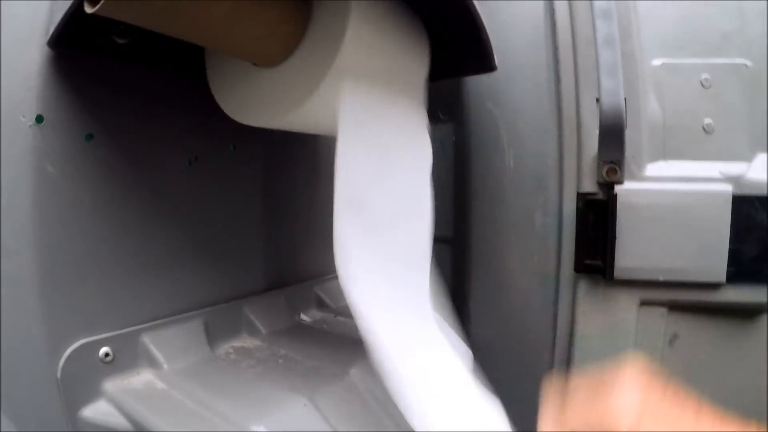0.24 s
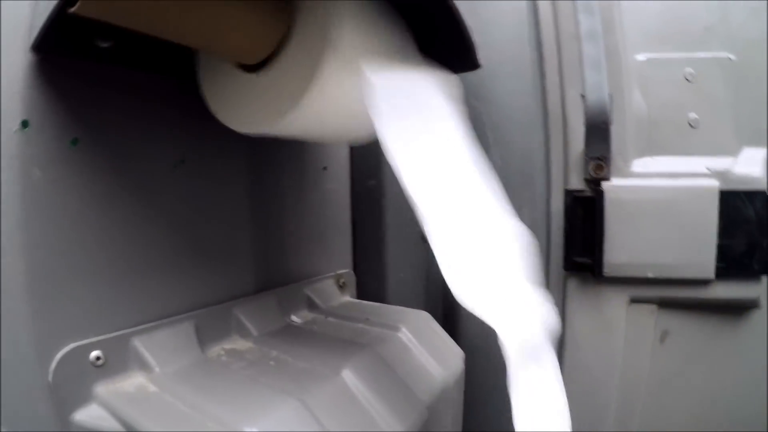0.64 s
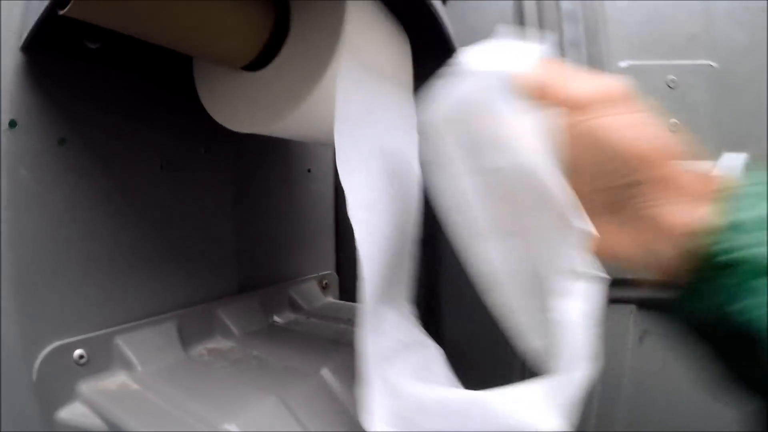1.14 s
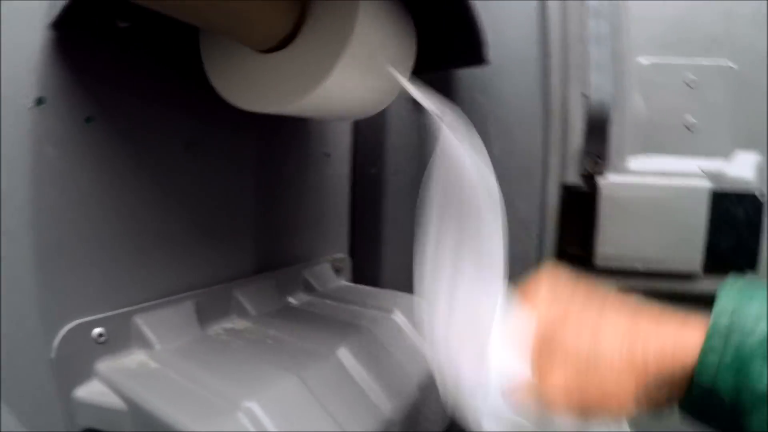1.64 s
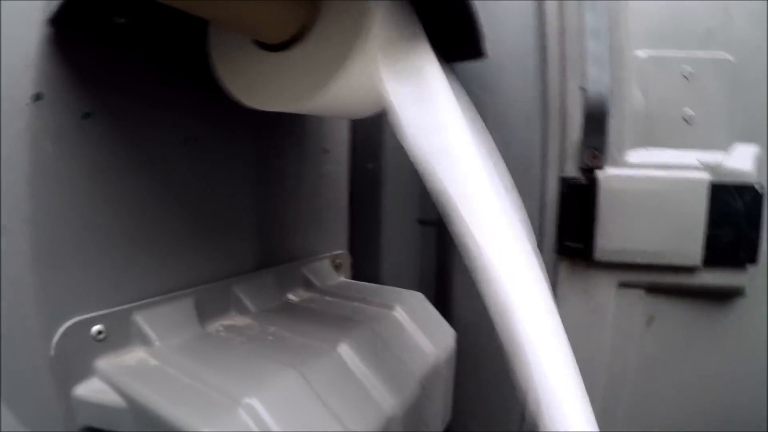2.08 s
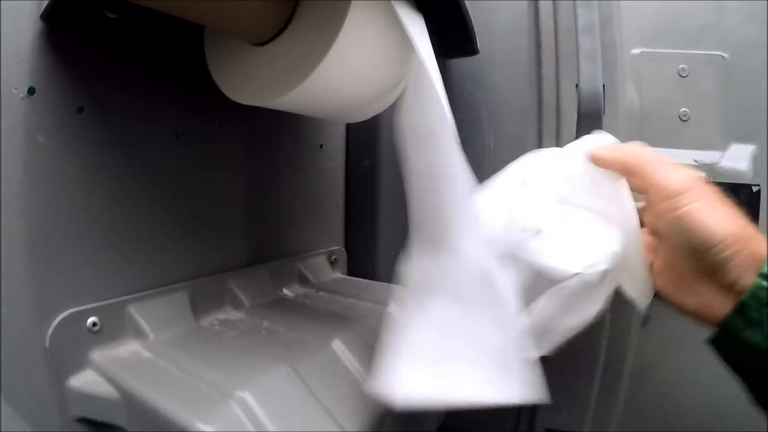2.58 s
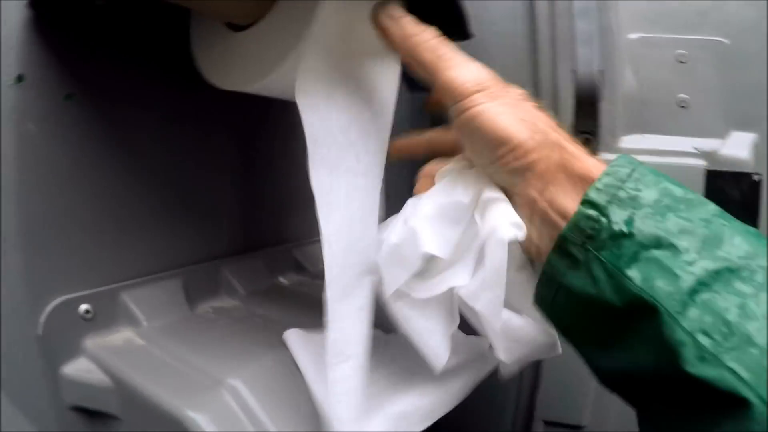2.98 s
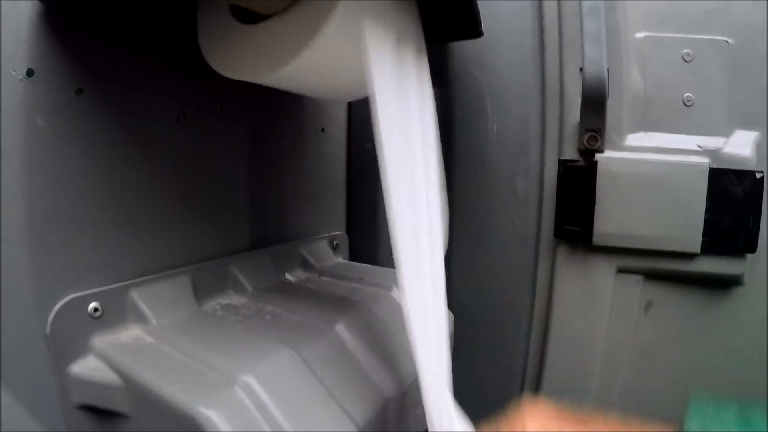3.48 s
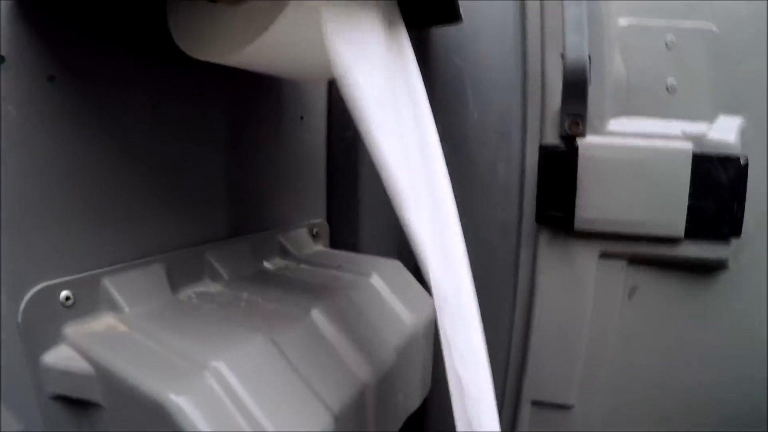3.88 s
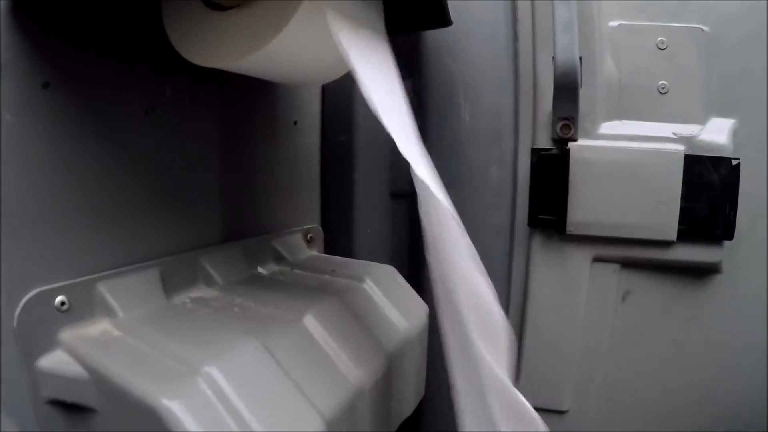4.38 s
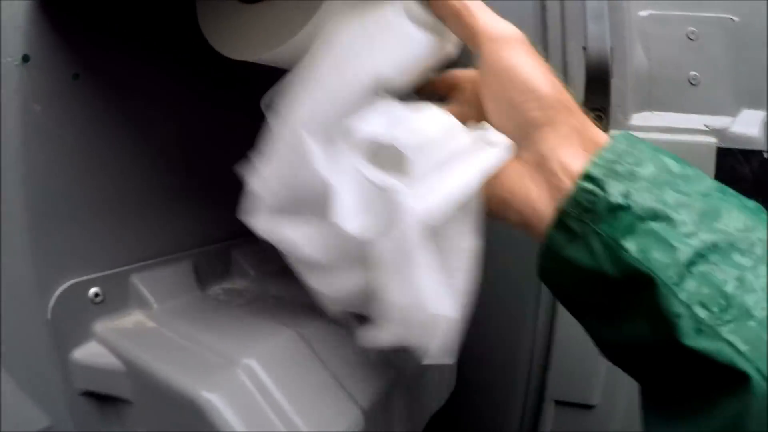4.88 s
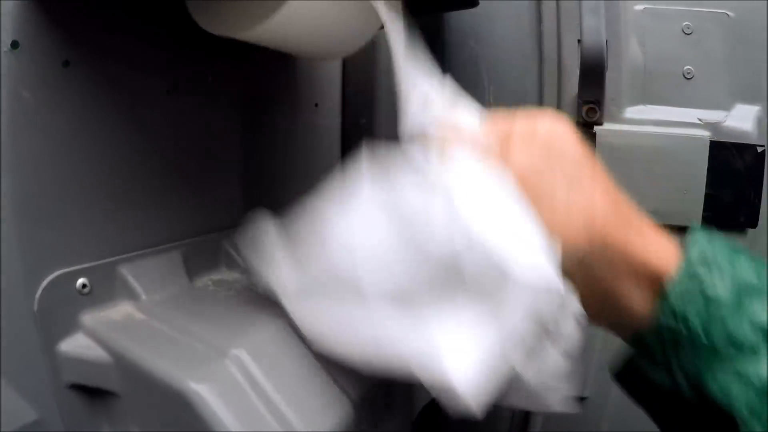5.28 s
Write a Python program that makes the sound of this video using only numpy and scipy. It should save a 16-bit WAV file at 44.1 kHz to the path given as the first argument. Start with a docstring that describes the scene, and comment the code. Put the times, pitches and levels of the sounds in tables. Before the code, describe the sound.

Quick pulls of thin paper hiss and crackle while the roll bumps and drums its plastic housing over a heavy low rumble in a small cabin.

```python
"""Paper roll in a small plastic cabin

Inside a small plastic cabin, paper is pulled off a roll in a plastic wall dispenser. The roll drums the
housing as filtered noise, hums in its tube, and jumps and knocks as damped resonances. The sheet rustles,
hisses and snaps in grainy noise; the lid claps and clatters. The thin walls boom with every move.
Two unequal microphone ports take it in, opening from mono to stereo soon after one second.
"""
import sys
import numpy as np
from scipy import signal
from scipy.fft import rfft, irfft, next_fast_len
from scipy.io import wavfile
from scipy.ndimage import uniform_filter1d, map_coordinates

SR = 44100
rng = np.random.default_rng(int(sys.argv[2]) if len(sys.argv) > 2 else 0)


def unload_audio(sound):
    """Save the sound as a 16-bit wav file, at the path given as the first command line argument."""
    columns = np.transpose(np.atleast_2d(sound))
    # keep every value between -1 and 1, then stretch to whole-number steps
    steps = np.round(np.clip(columns, -1, 1) * 32767)
    wavfile.write(sys.argv[1], SR, steps.astype(np.int16))


N = 243843

# In every table, left-right is the left port's level over the right port's.
# Answer of the cabin: f/Hz, t60/s
CABIN_DECAY = [(200, 0.06), (1000, 0.18), (3000, 0.19), (10000, 0.32)]
# Boom of the cabin walls: t/s, deep level/dB, upper level/dB, left-right/dB
WALL_BOOM = [(0.0, -48, -41, 0), (0.06, -32.5, -36.5, -7), (0.34, -42, -52, -6), (0.66, -28, -26, -11),
             (0.88, -36.5, -37, -4), (1.77, -17.5, -25.5, 0.5), (1.8, -28, -35, -3), (1.88, -28, -13, -2),
             (2.08, -16, -26, 1), (2.39, -20.5, -23.5, -6), (2.43, -13.5, -24.5, -2),
             (2.54, -24, -24, -4.5), (2.59, -19, -14, -1.5), (2.68, -20.5, -20, -5), (3.28, -26, -31.5, -6),
             (3.33, -19.5, -29.5, -0.5), (3.49, -13, -17.5, -2), (3.54, -23, -26.5, -2),
             (3.68, -19.5, -13.5, 0), (3.91, -21, -26.5, -5), (4.3, -26.5, -28, -1),
             (4.34, -24, -33.5, -8.5), (5.05, -25, -31, -3), (5.08, -16, -25, -2.5), (5.22, -24, -32, -3),
             (5.36, -20, -30, 1), (5.41, -20, -18.5, 1), (5.53, -34, -30, -7)]
# Spectra of the deep and upper boom: f/Hz, relative level/dB per Hz
DEEP_SPECTRUM = [(8.8, -60), (15, -6), (52, 1.5), (68, -12), (110, -120)]
UPPER_SPECTRUM = [(31, -13), (52, 0), (75, 4.5), (113, -15), (150, -12), (200, -29.5), (330, -120)]
# Low flutter over the boom: t/s, level/dB, left-right/dB
WALL_FLUTTER = [(0.0, -44, 4), (0.21, -50, -3), (0.46, -50, 0.0), (0.6, -42, 4), (1.0, -52, 8),
                (1.68, -43, -1), (2.19, -49, -4), (2.32, -35, -22), (2.37, -43, -0.5), (2.69, -28, -17),
                (2.72, -41, 3), (2.8, -39, -11.0), (2.86, -28, 4), (2.99, -48, -21), (3.02, -51, 6),
                (3.17, -26.5, -22.5), (3.22, -36, 6), (3.34, -30.5, 0), (3.7, -38, 0), (3.77, -27.5, -18),
                (4.34, -36, 11), (4.56, -34, -28), (4.76, -50, -17), (5.53, -27, -5)]
GUST_DB, GUSTS_PER_S = 1, 12  # random swells of the boom
# A knock shoves the wall: hold, fall, then levels re the knock in the wall
SHOVE_S, SHOVE_FALL_DB_PER_S, SHOVE_BOOM_DB, SHOVE_FLUTTER_DB = 0.024, 201, -2, -8

# Dead bumps that do not ring: t/s, pulse height/dB, half width at 1/e/s
PUSH_EVENTS = [(1.2494, -18, 0.00065), (1.252, -13, .0011)]
# Lid claps and clatters on: t/s, clap level/dB before the modes, ring time/s, clatter level/dB, clatter t60/s
CLAP_EVENTS = [(.002, -50, .002, -48, 0.13), (0.061, -43, 0.0022, -47, 0.14),
               (0.614, -37, 0.0024, -35.5, 0.14), (1.25, -51, .0015, -47, 0.16),
               (2.097, -20.5, 0.0022, -31, .16), (2.118, -36, .002, -37, 0.19),
               (3.602, -20.5, 0.0026, -36, .12), (3.6729, -9, 0.0014, -27.5, 0.19),
               (5.017, -45, .002, -46.5, 0.13), (5.296, -48, .002, -46, .1), (5.3073, -27, 0.0018, -39, .1),
               (5.319, -28, .002, -37, 0.22), (5.3846, -9, 0.001, -29, 0.15), (5.418, -36, .002, -40, 0.19)]
# Modes of the lid: f/Hz, width/Hz, level/dB, left-right/dB
LID_MODES = [(2040, 810, -8, -5), (2595, 730, 1.5, -1), (3650, 860, -7, 0), (4680, 920, -15.5, 3),
             (6400, 1200, -27, -2)]
# Ticks and snaps: t/s, level/dB before a common trim, f/Hz, t60/s, share of ring (0-1)
TICK_EVENTS = [(0.17, -53, 3940, 0.07, 0.5), (0.3711, -47, 4050, 0.019, 0.6), (0.393, -45, 3680, 0.04, 0.4),
               (0.4299, -45, 6200, 0.02, 0.5), (0.4644, -46, 6200, 0.01, 0.8),
               (0.4903, -43, 3840, 0.04, 0.4), (0.5457, -45, 3520, 0.02, 0.3),
               (0.5796, -46, 6000, 0.02, 0.2), (.595, -50, 3500, .015, .2),
               (1.2495, -38, 1500, 0.0066, 0.4), (1.5609, -33, 3900, 0.042, 0.5),
               (1.7285, -39, 3800, .02, .6), (1.7534, -24, 2260, 0.015, 0.5), (1.7538, -33, 6500, .025, .6),
               (1.821, -44, 3900, .03, .9), (1.836, -39, 3900, .03, .9), (1.8678, -30, 3770, 0.026, 0.7),
               (1.938, -27, 3800, 0.012, 0.9), (3.008, -28.5, 3100, 0.017, 1),
               (3.21, -21.5, 5840, 0.0092, 0.44), (3.395, -31, 5600, .02, .7),
               (3.497, -24.5, 3880, 0.03, 1), (3.499, -29, 5540, .03, .8), (3.516, -28, 3830, .012, 1),
               (3.5674, -27, 3720, 0.024, 0.8), (3.573, -25, 3200, .02, .8), (3.575, -23, 7500, .02, .6),
               (4.1704, -40, 6260, 0.012, 0.5), (4.388, -28, 4500, 0.012, 0.3),
               (4.787, -32, 3080, 0.025, 1), (5.22, -36, 6940, 0.0097, 0.7)]
# Short grainy noise bands, low thumps and knock tones with higher rubs and scuffs:
# t/s, length/s, level/dB, centre f/Hz, width/Hz of one filter pass
BAND_EVENTS = [(.39, .04, -44, 165, 50), (.497, .03, -42, 490, 100), (.497, .015, -52, 1100, 500),
               (.55, .03, -42, 165, 50), (0.616, .03, -28, 309, 50), (1.418, 0.021, -41.5, 724, 160),
               (1.51, .03, -33.5, 165, 40), (1.56, 0.022, -46, 800, 200), (1.609, 0.017, -46, 830, 170),
               (1.654, 0.023, -43.5, 1010, 200), (1.68, 0.039, -34.5, 166, 40.4),
               (1.886, .03, -41, 520, 200), (1.935, 0.047, -47, 875, 250), (2.095, .025, -25, 300, 50),
               (2.1, .09, -28.5, 510, 150), (2.428, .035, -21, 188.5, 40), (2.425, .015, -47, 2480, 250),
               (2.435, 0.036, -29, 358, 50), (2.439, 0.02, -35, 613, 120), (2.57, .015, -38, 1400, 500),
               (2.59, .03, -22, 100, 30), (2.72, .03, -22, 100, 30), (3.002, 0.094, -52, 1510, 350),
               (3.24, .06, -40, 500, 150), (3.336, 0.017, -40, 1430, 300), (3.607, .007, -28, 1540, 300),
               (3.615, .02, -26, 326, 120), (3.644, 0.023, -30, 242, 50), (3.858, 0.011, -45.5, 1120, 250),
               (3.858, .015, -54, 3700, 500), (3.9, .2, -48, 750, 500), (3.933, .012, -52, 3800, 500),
               (4.0, .09, -57, 3850, 400), (4.063, 0.049, -48, 1140, 250), (4.075, 0.075, -37.5, 200, 60),
               (4.17, .06, -57, 3850, 500), (4.225, .1, -39, 200, 60), (4.201, 0.041, -43.5, 1060, 230),
               (4.461, 0.027, -47, 856, 200), (4.49, 0.04, -44.5, 1370, 300), (4.54, .1, -42.5, 200, 60),
               (4.55, .02, -45, 495, 150), (4.61, .02, -57, 1090, 250), (5.225, 0.045, -41.5, 465, 100),
               (5.303, .022, -26, 255, 40), (5.312, 0.083, -33, 540, 200)]
BAND_RISE_DB_PER_S, BAND_FALL_DB_PER_S = 1400, 500

# Steady slide of the sheet: t/s, rustle level/dB, fine hiss level/dB
SHEET_SLIDE = [(0.0, -84, -85), (0.38, -65, -74), (0.54, -89, -75), (0.85, -70, -67), (1.02, -63, -63.5),
               (1.13, -66, -65), (1.26, -52, -62), (1.35, -53, -60.5), (2.06, -48, -61), (2.88, -47.5, -59),
               (3.06, -43.5, -57.5), (3.4, -52, -61), (3.53, -58, -54), (3.63, -54, -70),
               (3.89, -44.5, -56), (4.02, -49.5, -61), (4.47, -45, -56), (4.59, -45, -58.5),
               (5.25, -50, -64), (5.53, -46.5, -59)]
# Grabs and tugs at it: t/s, length/s, rustle level/dB, fine hiss level/dB, scuffing level/dB, rise/dB per s
GRAB_EVENTS = [(0.0, 0.011, -65, -85, -77, 1200), (0.606, 0.0085, -50, -85, -62, 2000),
               (1.16, .04, -56, -66, -65, 600), (1.224, 0.08, -54, -65, -58, 300),
               (1.41, 0.013, -40.5, -57, -45, 2500), (1.558, 0.07, -49, -65, -66, 2500),
               (1.732, .012, -46, -62, -51, 3000), (1.7535, 0.027, -35, -49, -44, 6000),
               (1.87, 0.008, -43, -58, -48, 4000), (1.936, 0.0054, -42, -64, -58, 2498),
               (2.046, 0.075, -39, -55.5, -51, 500), (2.427, 0.023, -37, -53, -46, 1500),
               (2.477, 0.027, -41.5, -55, -51, 300), (2.547, .015, -49, -62, -60, 300),
               (2.982, 0.066, -53, -70, -46, 800), (3.208, 0.0089, -36.5, -52, -54, 6000),
               (3.317, 0.02, -41, -59, -66, 2000), (3.38, 0.021, -40, -55, -64, 250),
               (3.494, 0.01, -34, -50, -46, 1500), (3.51, 0.012, -42, -52, -43, 800),
               (3.565, 0.0084, -33, -48, -32.5, 1000), (3.6, 0.009, -36.5, -63, -50, 1000),
               (3.662, 0.026, -41, -75, -50, 1200), (3.847, 0.019, -39.5, -57, -56, 600),
               (3.928, 0.026, -41.5, -60, -46, 1200), (4.008, 0.069, -41, -56, -55, 1200),
               (4.17, 0.065, -40.5, -57, -46, 2000), (4.392, 0.021, -46.5, -67, -60, 3000),
               (4.488, 0.12, -40.5, -58, -50, 1200), (4.782, 0.021, -38.5, -55, -50, 1201.5),
               (4.933, 0.14, -43.5, -57, -48.5, 600), (5.219, 0.011, -47, -54, -50, 2500),
               (5.306, 0.022, -43, -74, -53, 1200), (5.384, 0.012, -32.5, -62, -36, 6000),
               (5.517, .03, -38, -56, -47, 800)]
GRAB_FALL_DB_PER_S = 290
SLIDE_PAN_DB, GRAB_PAN_DB = -0.5, 0.3  # left-right
# Dull brushing of the slack sheet: t/s, level/dB
SLACK_BRUSH = [(0.0, -75), (0.3, -82), (0.4, -66), (0.6, -67), (0.8, -70), (1.03, -56), (1.13, -61),
               (1.2, -51), (1.3, -54), (1.4, -59), (2, -63), (5.53, -62)]
# Spectra of rustle, fine hiss and brushing: f/Hz, relative level/dB per Hz
RUSTLE_SPECTRUM = [(1760, -2.5), (3000, -5.5), (3890, -5), (4240, -9), (4940, -7.5), (6270, 0.5),
                   (7650, -3), (8300, -13), (10800, -32), (18300, -120)]
HISS_SPECTRUM = [(4880, -47), (8300, -3), (9830, -4.5), (11300, -12), (12400, -11.5), (14800, -15.5)]
BRUSH_SPECTRUM = [(900, -30), (1600, -2), (4000, -3), (6600, -4), (7400, -22), (10000, -120)]

# Stretches in which the roll spins freely: t/s, length/s, drumming level/dB, tube hum level/dB
SPIN_EVENTS = [(0.0, 0.024, -53, -63), (0.162, 0.024, -53.5, -61), (0.396, 0.051, -61, -67),
               (0.53, 0.015, -58, -46), (0.564, 0.034, -42, -40), (1.277, .15, -49.5, -69),
               (1.497, 0.07, -44.5, -39), (1.559, 0.062, -40.5, -34), (1.645, 0.025, -36.5, -31.5),
               (1.708, 0.063, -37.5, -39), (1.905, .02, -33.5, -40), (1.945, 0.057, -33, -33.5),
               (2.271, 0.16, -42.5, -54), (2.644, 0.28, -41, -58), (2.997, 0.093, -41, -53),
               (3.246, 0.041, -45, -33.5), (3.357, 0.029, -26.5, -22), (3.532, 0.15, -27.5, -29.5),
               (3.795, 0.059, -37, -44.5), (3.953, 0.034, -40, -39), (4, 0.039, -36.5, -35),
               (4.07, 0.027, -38, -40), (4.207, 0.045, -38.5, -44), (4.526, 0.069, -35, -41),
               (4.928, 0.017, -41, -54), (5.261, 0.17, -39.5, -35), (5.396, 0.014, -31, -29)]
SPIN_RISE_DB_PER_S, SPIN_FALL_DB_PER_S = 170, 142
TUBE_RISE_DB_PER_S, TUBE_FALL_DB_PER_S = 319, 312
IDLE_DRUM_DB = -53.5
# After a knock the roll wobbles on: drumming and hum re the knock's body level
WOBBLE_DELAY_S, WOBBLE_S, WOBBLE_DRUM_DB, WOBBLE_HUM_DB = 0.026, 0.0078, -13, -15
# Air in the cardboard tube: f/Hz, width/Hz, level/dB, left-right/dB
TUBE_MODES = [(473.2, 20, 3, 3.5), (613, 40, -11.5, 1)]
HUM_STEADY = 0.48  # amplitude share of the hum that is a held tone
# Paper dragged over the housing: t/s, scuffing level/dB
DRAG = [(0.0, -51), (0.21, -71), (0.42, -60), (0.58, -59), (.8, -57), (1.02, -51), (1.12, -53.5),
        (1.19, -50.5), (1.43, -50), (2.03, -49), (2.22, -53.5), (2.77, -50.5), (3.43, -43), (3.54, -57),
        (3.65, -46), (4.07, -55), (4.24, -62), (4.45, -53.5), (4.65, -43), (5.24, -53), (5.53, -45)]
# Spectrum of the scuffing: f/Hz, relative level/dB per Hz
SCUFF_SPECTRUM = [(290, -8), (500, -6), (567, -7), (1390, -9), (1890, -16), (3120, -21.5), (5000, -23.5),
                  (6500, -41), (11000, -120)]
# Whisper of the spindle: f/Hz, width/Hz, level/dB, left-right/dB
SPINDLE_MODES = [(3880, 190, -8, 4), (5930, 250, 2, 6)]
SPIN_SCUFF_DB, WHISPER_DB = -19.5, -16.5  # scuffing re a spin; the spindle re the scuffing

# Knocks of the roll: t/s, level/dB in wall, body, shell and lid of the housing (before each group's trim),
# base rattle t60/s, share of one hard blow (0-1)
KNOCK_EVENTS = [(.001, -37, -28, -35.5, -40, 0.26, 0.36), (.06, -54, -50, -35, -40.5, 0.21, 0.42),
                (.279, -48, -51, -56, -79, 0.068, 0.81), (0.379, -42, -47, -56, -59, 0.17, 0.34),
                (0.5, -54, -37.5, -41, -63, 0.41, 0.57), (0.602, -47, -40, -27, -40, 0.088, 0.17),
                (.612, -35, -16, -25.5, -25, 0.21, 0.2), (1.2485, -32.5, -31, -30.5, -39, 0.09, 0.68),
                (1.276, -51, -56, -40, -40.5, 0.17, 0.65), (1.406, -40, -39.5, -37.5, -41, 0.31, 0.38),
                (1.556, -38, -49, -43, -70.5, 0.17, 0.68), (1.7531, -25, -26, -29, -44, 0.2, 0.72),
                (1.772, -39, -33.5, -34, -45, .15, .4), (1.968, -29, -23.5, -32, -41.5, 0.27, 0.45),
                (2.092, -29, -8.5, -24, -25, 0.11, 0.24), (2.096, -36, -13.5, -17, -19, 0.22, 0.37),
                (2.424, -17, -24.5, -35, -54, 0.33, 0.6), (2.462, -18, -28, -38, -61, 0.16, .6),
                (2.505, -21, -37, -51, -60, .2, 0.44), (2.566, -18.5, -22.5, -27.5, -52, 0.12, 0.47),
                (2.592, -20.5, -29, -45, -64, 0.22, .5), (2.718, -21.5, -31, -47, -51, 0.16, 0.3),
                (2.741, -27, -32.5, -52, -60, 0.11, 0.48), (2.851, -24, -27.5, -60, -55, 0.21, 0.4),
                (2.875, -27, -35.5, -58, -62, 0.15, .4), (3.21, -33, -31.5, -31, -36, 0.093, 0.73),
                (3.328, -36, -28, -19.5, -59, 0.17, 0.5), (3.492, -28.5, -47, -32.5, -55, 0.29, 0.32),
                (3.603, -27.5, -12.5, -20.5, -19.5, .15, 0.3), (3.623, -25, -20, -28, -31, 0.18, 0.36),
                (3.65, -27, -17.5, -21, -40, 0.18, 0.23), (3.6735, -21.5, -21.5, -21, -20, 0.23, 0.3),
                (4.079, -34.5, -56, -51, -65, 0.44, 0.34), (4.789, -36.5, -37, -35, -42, 0.08, 0.41),
                (5.014, -32.5, -27, -26.5, -35, 0.13, 0.52), (5.026, -27, -28, -32, -35, 0.21, .5),
                (5.057, -29, -30, -45, -36.5, 0.21, 0.39), (5.246, -39, -32.5, -45, -57, 0.12, 0.37),
                (5.303, -64, -17, -28, -27, 0.14, 0.17), (5.308, -50, -30, -28, -23, .08, .4),
                (5.317, -43, -20, -24.5, -24.5, 0.34, 0.45), (5.385, -28.5, -24, -26, -26, 0.19, 0.45)]
# Modes of housing and wall: f/Hz, width/Hz, level/dB, left-right/dB
HOUSING_MODES = [(159.8, 27, 6, -3), (185.3, 22.1, 9.5, -2.5), (251.5, 17.3, -2, 5.5),
                 (309.3, 15.2, 4.5, 4.5), (375, 33, -4, 10), (462, 46, -9.5, 9), (520, 33, -6.5, -3.5),
                 (586, 68, -12.5, 5.5), (719.9, 34, -13.5, 6), (800, 56, 0, 1.5), (933, 418, -3, 0.5),
                 (1090, 51, 1, -6), (1247, 93, 0.5, 1.5), (1609, 108, 2, -3), (1853, 174, 4.5, 10.5),
                 (2260, 700, 4, -0.5), (2260, 210, 7, -8), (2410, 630, 0, 0), (3290, 130, 11, -7),
                 (3520, 470, 6, 7), (4200, 240, -1, 2), (5000, 490, -20.5, -6)]
# Edges of the eight groups of modes: f/Hz
GROUP_EDGES_HZ = [130, 230, 335, 420, 720, 1150, 1700, 2900, 6000]
# The two pieces averaged for each group: indices of wall 0, body 1, shell 2, lid 3
GROUP_PIECES = [(0, 0), (1, 1), (0, 0), (1, 2), (2, 2), (2, 3), (3, 3), (3, 3)]
# Each group re its pieces: level/dB
GROUP_DB = [3.5, 4, 0, 7, 3, 6.5, 4.5, -3]
# Unpitched clatter within each group: level/dB
GROUP_BROAD_DB = [-32, -18, -17, -13, -8, -4.5, -2, -17]
GROUP_APART = [0.024, 0.044, .04, 0.2, 0.81, 0.64, 0.94, 0.19]  # opposed part of the rattle at the ports
GROUP_LIFE = [1.36, 0.34, 0.89, 0.99, 0.87, 0.72, 0.55, 0.5]  # factor on the rattle t60
SOFT_RISE_S = 0.0036  # rise of the rattle at hardness 0, shorter for harder blows
HARD_EDGE_DB = 19  # top group per unit of hardness, counted from 0.5
DETUNE = 0.027  # relative spread of the pitch of each higher mode from blow to blow

# Likeness of the noise at the two ports: f/Hz, correlation (0-1)
PORT_LIKENESS = [(30, 1), (90, 0.86), (135, 1), (190, 0.92), (330, 0.99), (700, 0.56), (1400, 0.051),
                 (2800, 0.44), (4200, 0.87), (6500, 0.03), (10000, 0.051)]
# Unequal microphone ports: f/Hz, left-right/dB before scaling
PORT_LEAN = [(60, 0.5), (150, 3), (380, -12), (950, 3), (2380, -1), (5980, -0.5), (15000, -3)]
# Opening from mono to stereo: t/s, share of left-right difference (0-1)
STEREO_WIDTH = [(0, 0), (1.14, 0), (1.2, .25), (1.32, 1.0), (5.53, 1.0)]
TOP_HZ = 16200


def amp(db):
    """dB to gain."""
    return 10 ** (np.asarray(db) / 20)


def unit(x):
    """Scaled to rms 1."""
    return x / np.sqrt(np.mean(x ** 2) + 1e-20)


def along(points, hz):
    """(Hz, value) points read on a log frequency axis."""
    f, v = np.transpose(points)
    return np.interp(np.log(hz + 1), np.log(f + 1), v)


def curves(rows):
    """One value per sample for each column after the time."""
    s, *cols = np.transpose(rows)
    return [np.interp(np.arange(N) / SR, s, c) for c in cols]


def wobble(rate):
    """A smooth random curve, rate knots a second."""
    knots = rng.standard_normal(int(N * rate / SR) + 4)
    return map_coordinates(knots, [np.arange(N) * rate / SR])


def filtered(x, response):
    """x through a complex response of frequency."""
    m = next_fast_len(N + SR // 2)
    return irfft(rfft(x, m) * response(np.fft.rfftfreq(m, 1 / SR)), m)[..., :N]


def panned(db):
    """Left and right gains for a level difference."""
    return amp(np.array([db, -db]) / 2)


def ringing(modes):
    """Causal left and right response of resonances, alternating in sign."""
    def response(f):
        total = 0
        for k, (centre, width, db, pan) in enumerate(modes):
            resonance = 1j * f * width / (centre * centre - f * f + 1j * f * width)
            total = total + (-1) ** k * amp(db) * panned(pan)[:, None] * resonance
        return total
    return response


def colour(points):
    """Gain of a spectrum table."""
    return lambda hz: amp(along(points, hz))


def noise(response, grain_db):
    """Stereo noise of rms 1, coloured, made lumpy by grains that both ports share."""
    def mix(hz):
        turn = np.arccos(np.clip(along(PORT_LIKENESS, hz), 0, 1)) / 2
        return np.array([np.cos(turn), np.sin(turn)])
    mid, side = filtered(rng.standard_normal((2, N)) * amp(grain_db), mix)
    return unit(filtered(np.array([mid + side, mid - side]), response))


def patchy(x, depth_db):
    """x with random patches of gain over time and frequency, as folds open and close."""
    z = signal.stft(x, nperseg=256)[2]
    field = uniform_filter1d(rng.standard_normal(z.shape[1:]), size=5, axis=0)
    field = uniform_filter1d(field, size=6, axis=1)
    return unit(signal.istft(z * amp(depth_db * unit(field)), nperseg=256)[1][:, :N])


def crackle(rate, top_db, t60):
    """Level in dB of fibres that give way at random: sudden rises that die quickly."""
    snaps = (rng.random(N) < rate / SR) * rng.exponential(size=N)
    dying = signal.lfilter([1], [1, -amp(-60 / (t60 * SR))], snaps)
    return 20 * np.log10(1 + amp(top_db) * dying)


def uneven(count, step, depth_db):
    """Random gain that jumps every step samples, like uneven bounces or grit."""
    return amp(depth_db * np.repeat(rng.standard_normal(count // step + 1), step)[:count])


def bursts(start_s, length_s, db, rise, fall):
    """Power-summed gain of events that rise, hold and fall at set dB per second."""
    t = np.arange(0, N + 32, 32) / SR
    start = start_s[:, None]
    early = np.maximum(start - t, 0)
    late = np.maximum(t - (start_s + length_s)[:, None], 0)
    power = amp(2 * (db[:, None] - rise * early - fall * late)).sum(axis=0)
    return np.interp(np.arange(N) / SR, t, np.sqrt(power))


def add_at(out, s, sound):
    """Lay one event into the stereo track at s seconds."""
    out[:, round(s * SR):][:, :sound.shape[1]] += sound


def cabin(x):
    """A fresh random tail every eighth of a second, each frequency dying at its own speed."""
    out, step = np.zeros((2, N + SR)), SR // 8
    for start in range(0, N, step):
        hz, t, z = signal.stft(rng.standard_normal((2, SR // 3)), SR, nperseg=256)
        decay = amp(-60 * t / along(CABIN_DECAY, hz)[:, None])
        tail = signal.istft(z * decay, SR, nperseg=256)[1]
        answer = signal.fftconvolve(x[:, start:start + step], tail / np.linalg.norm(tail[0]), axes=1)
        out[:, start:start + answer.shape[1]] += answer
    return out[:, :N]


def walls():
    """Light cabin walls boom at moves of arm and roll, with a low flutter on top; knocks shove them."""
    deep_db, upper_db, pan = curves(WALL_BOOM)
    knock_s, wall_db = np.transpose(KNOCK_EVENTS)[:2]
    shove = bursts(knock_s, SHOVE_S, wall_db, 1500, SHOVE_FALL_DB_PER_S)
    deep = noise(colour(DEEP_SPECTRUM), grain_db=GUST_DB * wobble(GUSTS_PER_S))
    upper = noise(colour(UPPER_SPECTRUM), grain_db=GUST_DB * wobble(GUSTS_PER_S))
    boom = amp(deep_db) * deep + np.hypot(amp(upper_db), amp(SHOVE_BOOM_DB) * shove) * upper
    flutter_db, flutter_pan = curves(WALL_FLUTTER)
    gain = np.hypot(panned(flutter_pan) * amp(flutter_db), amp(SHOVE_FLUTTER_DB) * shove)
    flutter = noise(ringing([(131.0, 41, 0, 0)]), grain_db=5.0 * wobble(14))
    return panned(pan) * boom + gain * filtered(flutter, lambda hz: 1 / (1 + (hz / 190) ** 6))


def pushes():
    """A short pressure bump and the slower swing back."""
    t, out = np.arange(N) / SR, np.zeros(N)
    for s, db, w in PUSH_EVENTS:
        bump = np.exp(-((t - s) / w) ** 2)
        swing_back = np.exp(-((t - s - 5 * w) / (2.9 * w)) ** 2) / 3.0
        out += amp(db) * (bump - swing_back)
    return out


def claps():
    """The stiff modes of the lid ring for a few milliseconds, then loose clatter dies away through them."""
    out, t = np.zeros((2, N + SR)), np.arange(SR // 4) / SR
    lid = ringing(LID_MODES)(np.fft.rfftfreq(len(t), 1 / SR))
    for s, db, ring_s, clatter_db, t60 in CLAP_EVENTS:
        u = t / ring_s
        tones = 0
        for hz, _, level, pan in LID_MODES:
            tone = np.sin(2 * np.pi * (hz * t + rng.random()))
            tones = tones + np.outer(amp(level) * panned(pan), tone)
        shake = rng.standard_normal((2, len(t))) * uneven(len(t), 180, 3.5)
        force = shake[0] + 0.21 * np.outer([1, -1], shake[1])
        clatter = unit(irfft(rfft(force) * lid, len(t)))
        clatter_gain = amp(clatter_db - 60 * t / t60) * (1 - np.exp(-t / 0.001))
        add_at(out, s, amp(db) * tones * u * np.exp(1 - u) / 2 + clatter_gain * clatter)
    return out[:, :N]


def ticks():
    """Short snaps: a broad crack, part of it through the damped resonance of the piece that gives way."""
    out, t = np.zeros((2, N + SR)), np.arange(SR // 10) / SR
    hz = np.fft.rfftfreq(len(t), 1 / SR)
    broad = 1 / (1 + 1800 / (1j * hz + 1)) ** 2 / (1 + 1j * hz / 7000) ** 2
    apart = np.sqrt((1 - np.clip(along(PORT_LIKENESS, hz), 0, 1)) / 2)
    for s, db, pitch_hz, t60, share in TICK_EVENTS:
        crack = rfft(rng.standard_normal((2, len(t))) * amp(-60 * t / t60))
        crack = crack[0] + 0.79 * np.array([apart, -apart]) * crack[1]
        ring = ringing([(pitch_hz, 600, 0, 0)])(hz)[0]
        snap = irfft(crack * broad * (1 - share + 4 * share * ring), len(t))
        add_at(out, s, amp(db - 2.0) * snap / np.abs(snap.mean(axis=0)).max())
    return out[:, :N]


def thumps_and_scuffs():
    """Short grainy noise bands: low thumps and knock tones, with higher rubs and scuffs."""
    out, t = np.zeros((2, N + SR)), np.arange(SR // 4) / SR - .03  # room for the rise
    hz = np.fft.rfftfreq(len(t), 1 / SR)
    for s, length, db, centre_hz, width_hz in BAND_EVENTS:
        grit = rng.standard_normal((2, len(t)))
        apart = 0.38 * min(centre_hz / 900, 1)  # low bands reach both ports more alike
        grit = (grit[0] + apart * np.outer([1, -1], grit[1])) * uneven(len(t), 200, 3.7)
        band = ringing([(centre_hz, width_hz, 0, 0)])(hz) ** 2
        tone = unit(irfft(rfft(grit) * band, len(t)))
        rise_db = BAND_RISE_DB_PER_S * np.maximum(-t, 0)
        fall_db = BAND_FALL_DB_PER_S * np.maximum(t - length, 0)
        add_at(out, s + t[0], amp(db - rise_db - fall_db) * tone)
    return out[:, :N]


def grabs():
    """Gain of rustle, hiss and scuffing from the hand's grabs."""
    s, length, *levels_db, rise = np.transpose(GRAB_EVENTS)
    return [bursts(s, length, db, rise[:, None], GRAB_FALL_DB_PER_S) for db in levels_db]


def sheet():
    """Soft paper slides and crackles: random fibre snaps modulate rustle, hiss and brushing noise."""
    fibres = crackle(150, top_db=-15.0, t60=0.015)
    rustle = patchy(noise(colour(RUSTLE_SPECTRUM), grain_db=0.44 * wobble(40) + fibres), depth_db=2.0)
    hiss = noise(colour(HISS_SPECTRUM), grain_db=0.23 * fibres)
    gains = []
    for slide_db, grab in zip(curves(SHEET_SLIDE), grabs()):
        slide = np.outer(panned(SLIDE_PAN_DB), amp(slide_db))
        gains.append(np.hypot(slide, np.outer(panned(GRAB_PAN_DB), grab)))
    brushing = patchy(noise(colour(BRUSH_SPECTRUM), grain_db=fibres), depth_db=2.5)
    return gains[0] * rustle + gains[1] * hiss + amp(curves(SLACK_BRUSH)[0]) * brushing


def roll():
    """The turning roll drums low housing modes and hums in its tube; paper scuffs, the spindle whispers."""
    s, length, drum_db, hum_db = np.transpose(SPIN_EVENTS)
    knock_s, body_db = np.transpose(KNOCK_EVENTS)[[0, 2]]

    def after_knock(db, fall):
        return bursts(knock_s + WOBBLE_DELAY_S, WOBBLE_S, body_db + db, 1000, fall)

    spin = bursts(s, length, drum_db, SPIN_RISE_DB_PER_S, SPIN_FALL_DB_PER_S)
    drumming = amp(IDLE_DRUM_DB) + np.hypot(spin, after_knock(WOBBLE_DRUM_DB, SPIN_FALL_DB_PER_S))
    spin_hum = bursts(s, length, hum_db, TUBE_RISE_DB_PER_S, TUBE_FALL_DB_PER_S)
    humming = np.hypot(spin_hum, after_knock(WOBBLE_HUM_DB, TUBE_FALL_DB_PER_S))
    scuffing = amp(curves(DRAG)[0]) + grabs()[2] + amp(SPIN_SCUFF_DB) * spin

    bumps = wobble(30)
    drum = drumming * noise(ringing(HOUSING_MODES[:9]), grain_db=1.3 * bumps)
    tube_hz, _, _, tube_pan = TUBE_MODES[0]
    tone = np.sin(2 * np.pi * np.cumsum(tube_hz + 10.0 * wobble(25)) / SR) * amp(3.3 * bumps)
    held = HUM_STEADY * np.outer(panned(tube_pan), unit(tone))
    breath = np.sqrt(1 - HUM_STEADY ** 2) * noise(ringing(TUBE_MODES), grain_db=2.6 * bumps)
    scuff_grain_db = 1.4 * bumps + crackle(170, top_db=-15.5, t60=0.15)
    scuff = scuffing * patchy(noise(colour(SCUFF_SPECTRUM), grain_db=scuff_grain_db), depth_db=1.5)
    whisper = scuffing * amp(WHISPER_DB) * noise(ringing(SPINDLE_MODES), grain_db=4.4 * wobble(35))
    return drum + humming * (held + breath) + scuff + whisper


def knocks():
    """Each jump of the roll: a hard blow and a dying rattle ring each part of the housing at its own strength."""
    out, t = np.zeros((2, N + SR)), np.arange(SR // 2) / SR
    hz = np.fft.rfftfreq(len(t), 1 / SR)
    for s, *piece_db, t60, hard in KNOCK_EVENTS:
        # no two blows land alike
        modes = HOUSING_MODES + np.outer(rng.normal(0, 1.9, len(HOUSING_MODES)), [0, 0, 1, 0])
        modes[:, 0] *= 1 + DETUNE * rng.standard_normal(len(modes)) * (modes[:, 0] > GROUP_EDGES_HZ[4])
        group_db = np.array(piece_db)[np.array(GROUP_PIECES)].mean(axis=1) + GROUP_DB
        group_db[7] += HARD_EDGE_DB * (hard - .5)
        shake = rng.standard_normal((2, len(t))) * (1 - np.exp(-t / (SOFT_RISE_S * (1 - hard))))
        shake = shake * uneven(len(t), 150, 2.77)
        groups = zip(GROUP_EDGES_HZ, GROUP_EDGES_HZ[1:], GROUP_BROAD_DB, group_db, GROUP_APART, GROUP_LIFE)
        for low, high, broad_db, db, apart, life in groups:
            members = [m for m, rest in zip(modes, HOUSING_MODES) if low < rest[0] < high]
            clatter = ringing([(np.sqrt(low * high), high - low, broad_db, 0)])(hz)
            soft = 1 / (1 + 1j * hz / (1.44 * high)) ** 2  # cardboard on plastic is a soft contact
            part = soft * (ringing(members)(hz) + clatter)
            rattle = shake * amp(-60 * t / (life * t60))
            force = rattle[0] + apart * np.outer([1, -1], rattle[1])
            force = (1 - hard) * force / np.linalg.norm(rattle[0]) + hard * (t == 0)
            ring = irfft(rfft(force) * part, len(t))
            add_at(out, s, amp(db) * ring / np.abs(ring).max())
    return out[:, :N]


def scene():
    """Everything in the cabin; its thin walls let the low end of the hits escape."""
    hits = knocks() + ticks() + claps() + pushes()
    kept_inside = filtered(hits, lambda hz: 1 / (1 + 500 / (1j * hz + 1)))
    return amp(-8.0) * cabin(kept_inside) + walls() + thumps_and_scuffs() + sheet() + roll() + hits


def record(dry):
    """Two unequal ports that lose the highest treble, stereo width, soft overload, band limit."""
    def port_response(hz):
        return panned(0.55 * along(PORT_LEAN, hz)) / (1 + (hz / 14500) ** 24)

    left, right = filtered(dry, port_response)
    mid, side = (left + right) / 2, curves(STEREO_WIDTH)[0] * (left - right) / 2
    ports = np.array([mid + side, mid - side])
    soft = ports / (1 + np.abs(ports / .97) ** 6) ** (1 / 6)
    return filtered(soft, lambda hz: hz < TOP_HZ)


dry = scene()
out = record(dry)
unload_audio(out)
```